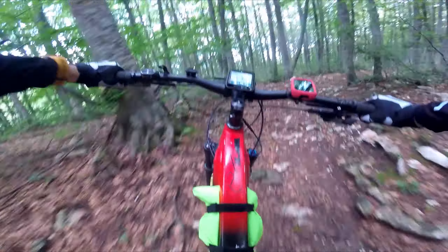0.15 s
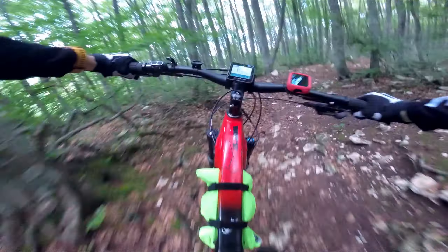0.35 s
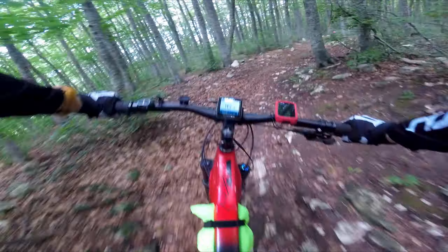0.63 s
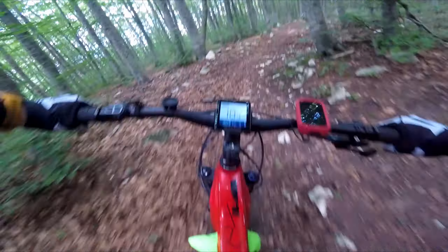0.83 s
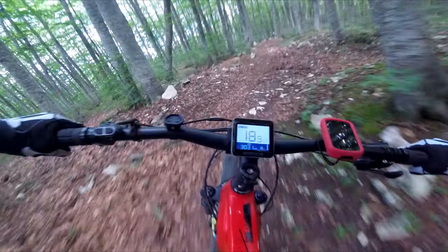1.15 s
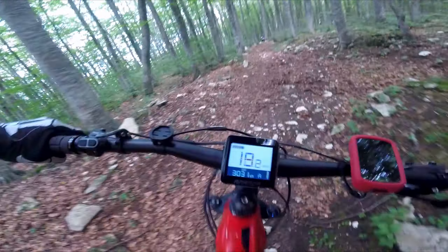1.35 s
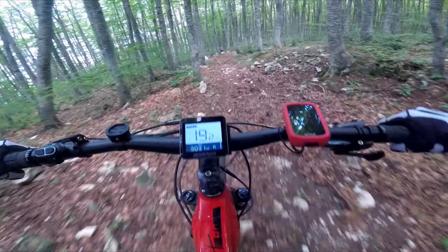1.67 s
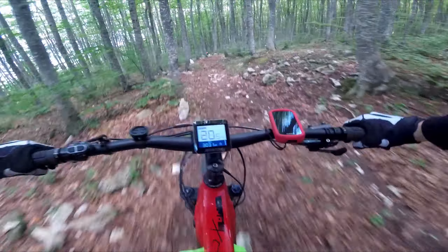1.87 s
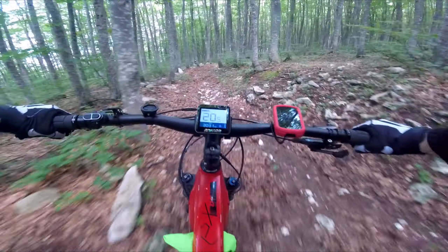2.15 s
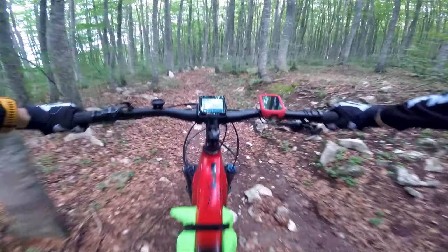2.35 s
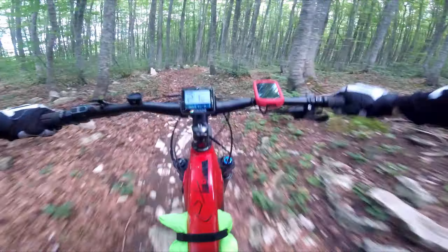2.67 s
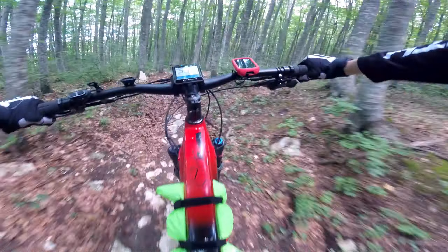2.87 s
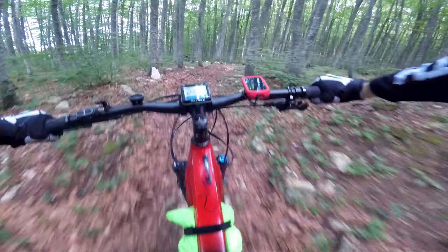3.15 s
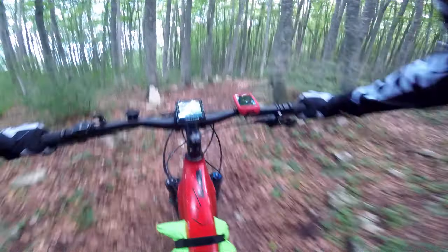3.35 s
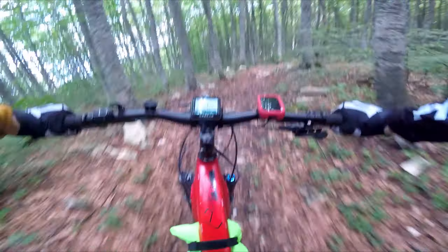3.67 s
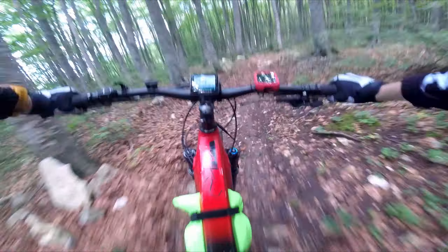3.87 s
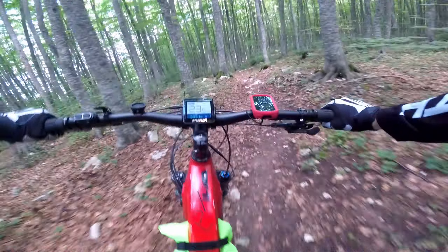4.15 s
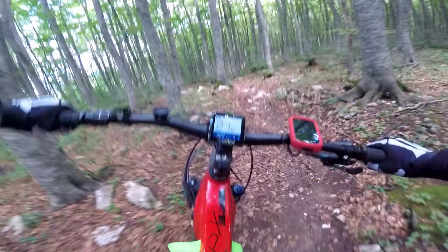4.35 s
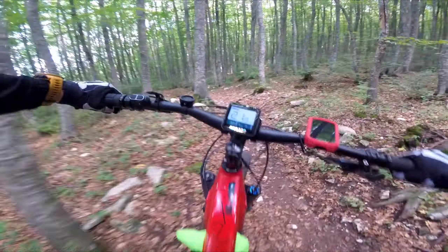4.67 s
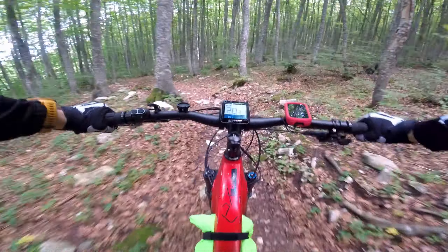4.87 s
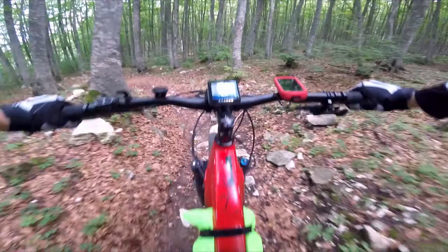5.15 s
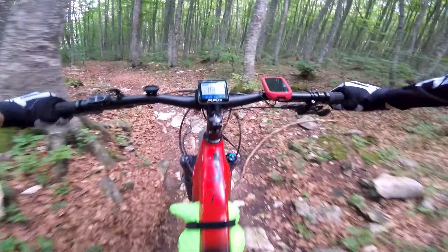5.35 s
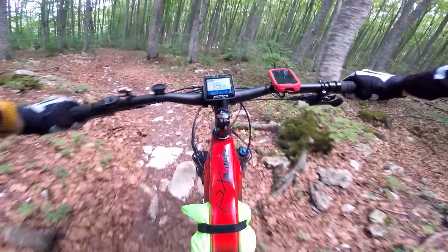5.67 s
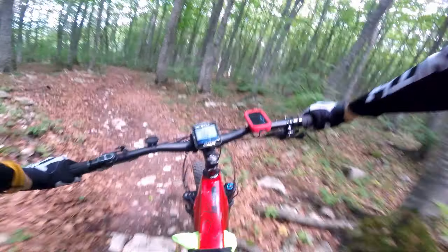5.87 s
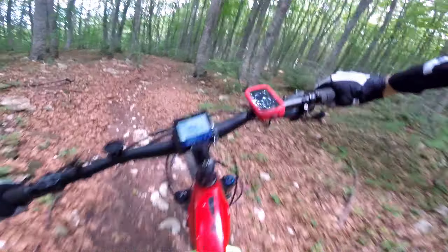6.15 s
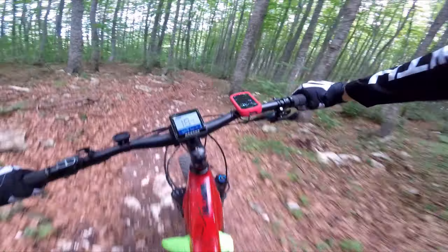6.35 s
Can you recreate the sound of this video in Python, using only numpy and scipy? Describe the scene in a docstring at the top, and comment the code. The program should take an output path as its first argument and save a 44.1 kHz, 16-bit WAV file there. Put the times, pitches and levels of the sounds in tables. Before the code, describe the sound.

Low, fluttering wind and thudding tyres dominate this close, dry ride through woods. Over them, dry leaves and gravel crackle, rising and falling with the ground, while the bike's frame and chain knock sharply against stones at uneven moments. Tiny bright ticks flick by and a faint thin brake hiss comes and goes. Early on, the camera mount takes several heavy muffled bumps and a short rub. The treble is slightly dulled by the housing.

```python
"""On a forest trail, a mountain bike runs fast, heard from a small camera on the rider's chest.
The tyres drum on the soil, crunch gravel and crush leaves: showers of random clicks shaped by filters.
Chain and frame clack over stones and grit ticks: short bursts of noise that set off ringing filters.
A thin hiss, as of brake pads, is filtered noise; the camera mount is bumped (sinking tones) and rubs
(a groan and a scuff). Wind buffets the camera's port: deep noise that swells and fades."""
import sys
import numpy as np
from scipy import signal
from scipy.fft import rfft, irfft, next_fast_len
from scipy.io import wavfile
from scipy.ndimage import uniform_filter1d

SR = 44100
rng = np.random.default_rng(int(sys.argv[2]) if len(sys.argv) > 2 else 0)


def unload_audio(sound):
    """Save the sound as a 16-bit wav file, at the path given as the first command line argument."""
    columns = np.transpose(np.atleast_2d(sound))
    # keep every value between -1 and 1, then stretch to whole-number steps
    steps = np.round(np.clip(columns, -1, 1) * 32767)
    wavfile.write(sys.argv[1], SR, steps.astype(np.int16))


N = 287091
TIME = np.arange(N) / SR  # seconds

# Levels marked "base" get a further trim or random sway in the function that uses them.
# In all spectra only the shape counts: each sound is scaled to a level afterwards.

# The tyres drum on the soil: t/s, base thud level/dB, base frame judder level/dB
DRUM_LEVELS = [(0.0, -38, -34), (0.31, -24, -32.5), (1.68, -29.5, -35.5), (2.01, -24, -35.5),
               (2.48, -24, -26.5), (3.19, -23.5, -27), (3.57, -31.5, -32.5), (4.0, -28, -33),
               (4.66, -22.5, -37.5), (5.35, -26.5, -25.5), (6.07, -30.5, -39.5), (6.51, -29.5, -30)]
# A wheel rides over a root or ridge:
# t/s at full load, thud level/dB, frame judder level/dB, crunch level/dB, release/s
ROOT_HITS = [(0.012, -13.5, -28, -45, 0.017), (0.27, -21, -38, -50, .025), (0.544, -12.5, -24, -38, 0.023),
             (0.774, -16, -20.5, -28, 0.012), (1.337, -26, -22, -33, 0.026), (1.39, -16.5, -46, -67, 0.02),
             (1.505, -16, -35, -60, 0.029), (1.564, -20.5, -27.5, -62, .025),
             (1.674, -14.5, -40, -36.5, 0.041), (2.01, -28, -40, -36, 0.035), (2.114, -26, -30, -40, .03),
             (2.344, -13.5, -22, -39, 0.054), (2.439, -9.5, -26, -38, 0.0073),
             (2.83, -35, -20, -28.5, 0.027), (2.99, -13, -35, -54, 0.057), (3.089, -14, -17, -41, 0.043),
             (3.182, -23, -31, -29, 0.08), (3.751, -18, -18.5, -57, 0.014), (3.932, -18, -21.5, -34, 0.033),
             (4.05, -18, -41, -30.5, 0.04), (4.235, -15.5, -23.5, -35, .025), (4.79, -14.5, -35, -42, .03),
             (4.866, -17, -39, -35, 0.055), (5.037, -17.5, -26.5, -28.5, 0.063),
             (5.433, -14, -18.5, -48, 0.027), (5.71, -19, -23.5, -32.5, 0.0067),
             (5.875, -20, -25.5, -33.5, .03), (5.961, -22, -30, -39, 0.03), (6.14, -24, -48, -41, 0.075)]
LOAD_ATTACK_S = 0.017  # the tyre squashes this fast
# Thuds of the tyres: f/Hz, level/dB per Hz
THUD_SPECTRUM = [(35, -13.5), (58, 5), (80, 1), (115, -2.5), (160, -5.5), (200, -8.5), (280, -26),
                 (500, -36.5), (1000, -66)]
# Judder of the frame: f/Hz, level/dB per Hz
JUDDER_SPECTRUM = [(120, -13.5), (195, 4.5), (280, 4), (340, -2.5), (420, -6.5), (550, -16.5), (1000, -49)]

# The ground under the tyres: t/s, base gravel crunch level/dB, base leaf rustle level/dB
GROUND_LEVELS = [(0.0, -35.5, -38.5), (0.34, -40.5, -51), (0.74, -46, -41), (1.09, -45.5, -49),
                 (1.45, -45, -52.5), (1.9, -45.5, -48), (2.06, -42.5, -50.5), (2.41, -38.5, -45.5),
                 (2.99, -34.5, -38.5), (3.66, -39.5, -47.5), (3.9, -39, -45.5), (4.62, -44, -46),
                 (4.91, -55, -44.5), (5.28, -30.5, -42.5), (5.53, -37, -49), (5.67, -43, -51.5),
                 (6.15, -45.5, -47), (6.51, -36.5, -52.5)]
# Gravel crunch: f/Hz, level/dB per Hz
GRAVEL_SPECTRUM = [(250, -19.5), (450, 8.5), (850, 5.5), (1150, 6.5), (1430, -1.5), (1780, 4.5), (2050, 2),
                   (2420, -3), (3000, -4.5), (4100, -50), (7000, -61.5)]
# Leaf rustle: f/Hz, level/dB per Hz
LEAF_SPECTRUM = [(1500, 6), (3000, 1), (4300, -1), (5300, 6.5), (6200, -2), (7000, -1), (9000, -4.5),
                 (10700, -9.5), (11900, -10), (13300, -3), (15000, -16)]
GRAVEL_PER_S, LEAVES_PER_S = 1500, 1900  # grains under the tyres

# The tyres slide through deep leaves: t/s, swish level/dB
SWISH_LEVELS = [(2.5, -73), (2.62, -40), (2.78, -33), (2.87, -35), (2.94, -34), (3.0, -57)]
# Sliding leaves: f/Hz, level/dB per Hz
SLIDING_SPECTRUM = [(2000, 15), (4000, -27), (5200, 2), (6300, 10.5), (7600, -2), (10600, 2), (12000, -7),
                    (13400, -3), (15000, -6)]

# Chain and frame clack over stones: t/s, base clack level/dB, clack centre f/Hz,
# base hollow knock level/dB, base bright edge level/dB, rattle time to fall by 60 dB/s
STONE_CLACKS = [(0.5474, -27.5, 2520, -26.5, -28.5, 0.12), (0.759, -13.5, 2400, -20.5, -26, 0.038),
                (1.238, -22.5, 3700, -28.5, -27, 0.044), (1.247, -20.5, 1500, -19, -37, 0.07),
                (1.26, -26, 3100, -31, -28.5, 0.099), (1.341, -33, 1410, -30, -39, .05),
                (2.2332, -28, 1690, -27.5, -52, 0.049), (2.385, -21.5, 2120, -17.5, -31.5, 0.09),
                (2.4873, -33, 1410, -24.5, -44, .04), (2.66, -27.5, 2980, -23, -35, 0.055),
                (2.7196, -25, 1970, -17, -41, 0.034), (2.9208, -17, 2190, -17.5, -19, 0.081),
                (3.0708, -22.5, 1890, -18.5, -41, 0.051), (3.1425, -26, 2970, -26, -25, .05),
                (3.3548, -25.5, 1860, -23, -44, 0.032), (3.376, -28, 1850, -26.5, -31, 0.071),
                (3.4815, -26.5, 2370, -24.5, -29, 0.22), (3.582, -19, 2760, -24, -26, 0.1),
                (3.637, -31, 2980, -45, -25.5, 0.035), (3.731, -26, 1670, -25.5, -38, 0.046),
                (4.036, -15, 1920, -18.5, -24.5, 0.076), (4.06, -22, 2270, -28, -48, 0.11),
                (4.2139, -15.5, 2300, -18, -25.5, 0.064), (4.4661, -26.5, 1830, -50, -38, 0.045),
                (4.871, -32.5, 2000, -31, -29.5, 0.045), (5.025, -26, 2080, -26, -38, 0.053),
                (5.221, -13, 2380, -18.5, -21.5, 0.022), (5.2805, -23, 2080, -29, -22, .06),
                (5.351, -26, 2400, -38, -22.5, 0.18), (5.4071, -17.5, 3700, -21, -22.5, 0.033),
                (5.4234, -27, 1410, -14, -52, 0.043), (5.466, -22.5, 1820, -31, -23.5, 0.12),
                (5.699, -18, 1700, -13, -38.5, 0.075), (6.4926, -30, 2750, -41, -24.5, 0.013)]
# Each clack is a light graze, a bright touch, a hollow main blow and a rebound:
# t/s from the row's time, then steps on the clack level/dB, knock level/dB, edge level/dB
CONTACT_STEPS = [(-.004, -12, -9, -10.5), (-.0005, -0.5, -4.5, 0.5), (.006, -5.5, -1.5, -10.5),
                 (0.0129, -18, -12.5, -15)]
# What the frame and chain ring with: f/Hz, width/Hz, base level/dB
FRAME_MODES = [(394, 70, 6), (626, 280, -0.5), (850, 740, 5), (925, 120, 16.5), (1022, 160, -3),
               (1770, 220, 16), (2400, 250, 13), (2630, 140, 16.5), (3180, 96, 8), (3450, 34, 14.5),
               (4080, 150, 0), (5300, 420, 14), (6340, 420, 7), (7100, 100, -22), (7540, 160, 7),
               (9520, 100, 5.5)]

# The larger bits of grit and twig flicked against the bike: t/s, peak level/dB, ring f/Hz
LARGE_TICKS = [(0.1998, -22.5, 6000), (0.623, -32, 5900), (1.0043, -29, 5400), (1.3192, -31, 5380),
               (1.4744, -29.5, 5300), (1.798, -30.5, 5450), (1.848, -25, 5400), (2.0547, -33.5, 5750),
               (2.1268, -25.5, 5430), (2.2516, -23.5, 5630), (2.8546, -22, 6300), (3.033, -30, 5240),
               (3.0924, -32, 5440), (3.2266, -25, 5300), (3.679, -31, 5530), (3.7416, -32, 5500),
               (4.2453, -28, 6200), (4.349, -31.5, 5040), (4.643, -36, 5400), (4.802, -31.5, 5300),
               (5.053, -24, 5400), (5.137, -37, 5360), (5.314, -26.5, 3900), (6.15, -28.5, 5400)]
# Finer grit flies at random
GRIT_PER_S, GRIT_OVER_LEAVES_DB, GRIT_SPREAD_DB = 13, 12, 1
GRIT_HZ, GRIT_SPREAD_OCTAVES = 5400, 0.14

# A thin high hiss comes and goes, as of brake pads brushing the discs: start t/s, end t/s, level/dB
BRAKE_BRUSHES = [(0.0, 0.456, -57), (0.55, 1.022, -53.5), (2.244, 2.603, -53), (4.33, 4.597, -52),
                 (5.007, 5.5, -53)]
BRUSH_FADE_S = 0.018
# The hiss of the discs: f/Hz, level/dB per Hz
DISC_SPECTRUM = [(9000, -18), (10400, -6), (11100, -2), (12000, -15), (12700, -9), (13400, 0), (14500, -24)]

# Dull bumps on the camera mount:
# t/s, peak level/dB of the swell, starting f/Hz, final f/Hz, swell/s, peak click level/dB
MOUNT_BUMPS = [(0.395, -3, 307, 239, 0.0042, -19), (0.5854, 0.5, 295, 131, 0.0028, -42),
               (0.774, 0, 168, 70.4, 0.002, -28), (0.8386, -7, 438, 280, 0.0042, -7.5),
               (2.327, -8, 177, 117.5, 0.0084, -38)]
# The mount rubs and groans: t/s, base pitch f/Hz, groan level/dB, scuff level/dB
MOUNT_RUB = [(0.303, 460, -62, -40), (0.32, 492, -50, -20.5), (0.35, 333, -14.5, -29.5),
             (0.39, 271, -19, -27.5), (0.42, 260, -49, -36)]
# Scuff of the cloth: f/Hz, level/dB per Hz
SCUFF_SPECTRUM = [(300, 1), (680, 6), (1050, -4), (1350, -9), (1620, 1), (2200, -13), (2550, -10),
                  (3100, -19), (4300, -20), (5100, -1.5), (6200, -9), (8300, -16.5), (10700, -23),
                  (12000, -26)]

# Air on the port: t/s, base buffeting level/dB
WIND_LEVELS = [(0.0, -6), (0.05, -14), (0.82, -13.5), (0.85, -23.5), (1.43, -10.5), (1.58, -17.5),
               (2.45, -17.5), (2.65, -11.5), (2.83, -12.5), (3.24, -10.5), (4.42, -13.5), (4.48, -19.5),
               (4.68, -13), (5.02, -13.5), (5.06, -11), (5.58, -10), (5.69, -14), (6.51, -12.5)]
# Buffeting of the wind: f/Hz, level/dB per Hz
WIND_SPECTRUM = [(12, -5.5), (20, 1.5), (28, 7.5), (40, -6.5), (55, -6), (70, -19.5), (100, -15),
                 (200, -51), (600, -77.5)]

CUTOFF_HZ = 15000  # nearly nothing is left above this


def from_db(db):
    """Turn decibels into a gain."""
    return 10 ** (np.asarray(db) / 20)


def rms_one(x):
    """Scale a sound to an average power of one."""
    return x / np.sqrt(np.mean(x ** 2) + 1e-20)


def in_time(rows):
    """Draw straight lines between the rows, giving each column a value at every sample."""
    s, *columns = np.transpose(rows)
    return [np.interp(TIME, s, column) for column in columns]


def butter(x, hz, kind, order=2):
    """Keep the lows, the highs or a band, using no future samples."""
    safe_hz = np.clip(hz, 10, .45 * SR)
    sos = signal.butter(order, safe_hz, kind, fs=SR, output="sos")
    return signal.sosfilt(sos, x + 1e-18)


def colour(x, spectrum):
    """Filter a sound along a spectrum without any pre-echo (minimum phase)."""
    size = 2 * next_fast_len(len(x) // 2 + SR // 4)
    hz, db = np.transpose(spectrum)
    grid = np.maximum(np.arange(size // 2 + 1) * SR / size, 1)
    wanted_db = np.interp(np.log(grid), np.log(hz), db)
    # folding the cepstrum forward in time makes the filter causal
    cepstrum = irfft(np.log(from_db(wanted_db)))
    cepstrum[1:size // 2] *= 2
    cepstrum[size // 2 + 1:] = 0
    response = np.exp(rfft(cepstrum))
    return irfft(rfft(x, size) * response)[:len(x)]


def drift(rate):
    """Wander at random around zero with spread 1; rate is the filter's corner in Hz."""
    # made at every 40th sample, then joined by straight lines
    r = np.exp(-80 * np.pi * rate / SR)
    noise = rng.standard_normal(N // 40 + 2002)
    slow = signal.lfilter([1], [1, -2 * r, r * r], noise)[2000:]
    return np.interp(np.arange(N) / 40, np.arange(len(slow)), rms_one(slow))


def steady(x, span_s):
    """Even out the power to one over every stretch of this length; faster detail stays."""
    power = uniform_filter1d(x ** 2, max(int(span_s * SR), 2))
    return x / np.sqrt(np.maximum(power, 1e-12))


def add(out, s, sound):
    """Mix a sound in at a time in seconds."""
    at = max(int(s * SR), 0)
    out[at:at + len(sound)] += sound[:max(N - at, 0)]


def at_peak(x, db):
    """Scale each blow so that its loudest two milliseconds have this level."""
    power = uniform_filter1d(x ** 2, SR // 500)
    return x * from_db(db) / np.sqrt(power.max(axis=-1, keepdims=True) + 1e-20)


def grains(per_s, spread_db):
    """Scatter clicks of random size and sign; spread_db sets how far the sizes vary."""
    sizes = from_db(spread_db * np.minimum(rng.exponential(1, N), 5))
    signs = rng.choice([-1, 1], N)
    happens = rng.random(N) < per_s / SR
    return rms_one(sizes * signs * happens)


def root_loads():
    """Each root squashes the tyre quickly and lets it go slowly; gains of thud, judder and crunch."""
    out = np.zeros((3, N))
    t = TIME[:SR // 2] - TIME[SR // 20]  # starts 0.05 s before full load
    for s, thud_db, judder_db, crunch_db, release_s in ROOT_HITS:
        age = t[s + t >= 0]
        load = np.exp(-np.where(age < 0, (age / LOAD_ATTACK_S) ** 2, age / release_s))
        for gain, db in zip(out, (thud_db, judder_db, crunch_db)):
            add(gain, s + age[0], from_db(db) * load)
    return out


def drumming(root_thud, root_judder, jolt_db=2.5, thud_gain_db=1.5, judder_gain_db=-1.0):
    """Knobs, pebbles and roots thud through the tyres and make the frame judder."""
    thud_db, judder_db = in_time(DRUM_LEVELS)
    thuds = steady(colour(grains(per_s=370, spread_db=2.0), THUD_SPECTRUM), span_s=0.0594)
    judder = steady(colour(grains(per_s=270, spread_db=3.5), JUDDER_SPECTRUM), span_s=0.09)
    shake_db = jolt_db * drift(rate=55)
    # hypot adds the powers of the soil and the roots
    thud_gain = np.hypot(from_db(thud_db + thud_gain_db + shake_db), root_thud)
    judder_gain = np.hypot(from_db(judder_db + judder_gain_db + shake_db), root_judder)
    return thud_gain * thuds + judder_gain * judder


def tyres(root_crunch, gravel_gain_db=0.5, leaf_gain_db=2.0, root_leaf_db=-5, gravel_jolt_db=2.2,
          leaf_jolt_db=3.0, clump_db=-2.0, chatter_db=-8, snap_db=-2.5):
    """The tyres grind gravel in clumps and crush leaves; roots and small jolts press both harder."""
    gravel_db, leaf_db = in_time(GROUND_LEVELS)
    jolt = drift(rate=22)
    gravel_grains = grains(GRAVEL_PER_S, spread_db=3.0) + .5 * rng.standard_normal(N)
    gravel = rms_one(colour(gravel_grains, GRAVEL_SPECTRUM))
    leaf_grains = grains(LEAVES_PER_S, spread_db=3.0) + 0.98 * rng.standard_normal(N)
    leaves = steady(colour(leaf_grains, LEAF_SPECTRUM), span_s=.12)
    # the chain and cables chatter, carried by the same shaking as the gravel
    chatter = rms_one(frame(grains(per_s=280, spread_db=5.5), np.zeros(len(FRAME_MODES))))
    crackle = from_db(snap_db) * snaps()
    clumps = from_db(clump_db * drift(rate=23))
    crunch = steady(clumps * gravel + from_db(chatter_db) * chatter + crackle, span_s=.12)
    crunch_gain = np.hypot(from_db(gravel_db + gravel_gain_db + gravel_jolt_db * jolt), root_crunch)
    leaf_gain = np.hypot(from_db(leaf_db + leaf_gain_db + leaf_jolt_db * jolt),
                         from_db(root_leaf_db) * root_crunch)
    return crunch_gain * crunch + leaf_gain * leaves


def snaps(per_s=170, spread_db=1.4, width=0.16, low_hz=700, high_hz=3300):
    """Twigs and pebbles give way one by one, each with a short ring at one of 14 pitches."""
    sizes = from_db(spread_db * np.minimum(rng.exponential(1, N), 3))
    clicks = sizes * (rng.random(N) < per_s / SR)
    pitches = np.geomspace(low_hz, high_hz, 14)
    dealt = rng.integers(0, len(pitches), N)
    rings = 0
    for k, hz in enumerate(pitches):
        band = [hz / (1 + width), hz * (1 + width)]
        rings = rings + butter(clicks * (dealt == k), band, "band") / hz
    return rms_one(rings)


def swish():
    """Sliding leaves crackle so densely that they merge into a bright hiss."""
    level_db, = in_time(SWISH_LEVELS)
    return from_db(level_db) * rms_one(colour(grains(per_s=15000, spread_db=4.5), SLIDING_SPECTRUM))


def clacks(clack_gain_db=-0.1, knock_gain_db=-.5, edge_gain_db=-0.4):
    """Every stone sets off the same quick run of contacts between chain and frame."""
    out = np.zeros(N)
    after_s, clack_step_db, knock_step_db, edge_step_db = np.transpose(CONTACT_STEPS)[:, :, None]
    for s, clack_db, clack_hz, knock_db, edge_db, rattle_t60 in STONE_CLACKS:
        rings = np.array([clack(rattle_t60) for _ in CONTACT_STEPS])
        # split the ringing into a middle clack, a hollow knock and a bright edge
        centred = butter(rings, [clack_hz / 1.35, clack_hz * 1.35], "band", order=1)
        middle = butter(centred, [1300, 4700], "band")
        knock = butter(rings, [320, 1250], "band", order=3)
        edge = butter(rings, [4900, 10000], "band", order=3)
        blows = (at_peak(middle, clack_db + clack_step_db + clack_gain_db)
                 + at_peak(knock, knock_db + knock_step_db + knock_gain_db)
                 + at_peak(edge, edge_db + edge_step_db + edge_gain_db))
        for delay_s, blow in zip(after_s[:, 0], blows):
            add(out, s + delay_s, blow)
    return out


def clack(rattle_t60, crack_s=0.0023, rattle_db=-12, rattle_per_s=900, contact_db=0.5):
    """A gritty contact cracks and sets the frame ringing, then the chain rattles out in smaller touches."""
    t = TIME[:SR // 10]
    crack = rng.standard_normal(len(t)) * (t / crack_s) ** 2 * np.exp(4 - 4 * t / crack_s) / 2
    touches = rms_one(rng.standard_normal(len(t)) * (rng.random(len(t)) < rattle_per_s / SR))
    force = crack + touches * from_db(rattle_db - 60 * t / rattle_t60)
    # the contact itself is heard beside the ringing it starts
    return rms_one(frame(force, strike_point())) + from_db(contact_db) * rms_one(force)


def frame(force, shares_db):
    """The bike's resonances ring side by side, each with its share of the blow."""
    out = 0
    for k, (hz, width_hz, db) in enumerate(FRAME_MODES):
        r = np.exp(-np.pi * width_hz / SR)  # the wider the resonance, the sooner it dies
        top = np.array([1, 0, -1]) * (1 - r * r) / 2
        bottom = [1, -2 * r * np.cos(2 * np.pi * hz / SR), r * r]
        mode = signal.lfilter(top, bottom, force + 1e-18)
        out = out + (-1) ** k * from_db(db + shares_db[k]) * mode
    return out


def strike_point():
    """Each place on the bike favours other resonances: random shares in dB."""
    return 2.5 * rng.standard_normal(len(FRAME_MODES))


def ticks(ring_s=0.0021, body_db=-7, tail_db=-24, tail_t60=0.031):
    """Small hard things ping for a few milliseconds and faintly stir the frame."""
    out, t = np.zeros(N), TIME[:SR // 30]
    for s, db, hz in LARGE_TICKS + fine_grit():
        fading = np.exp(-t / ring_s) + from_db(tail_db - 60 * t / tail_t60)
        force = rng.standard_normal(len(t)) * fading
        ping = rms_one(butter(force, [hz * 0.96, hz * 1.05], "band", order=1))
        body = rms_one(butter(frame(force, strike_point()), 1500, "high"))
        add(out, s, at_peak(ping + from_db(body_db) * body, db))
    return out


def fine_grit(count=140):
    """Random small ticks, louder where the leaves rustle more: rows of t/s, peak level/dB, ring f/Hz."""
    times = np.cumsum(rng.exponential(1 / GRIT_PER_S, count))
    trail_s, _, leaf_db = np.transpose(GROUND_LEVELS)
    spread_db = GRIT_SPREAD_DB * rng.standard_normal(count)
    db = np.interp(times, trail_s, leaf_db) + GRIT_OVER_LEAVES_DB + spread_db
    hz = GRIT_HZ * 2 ** (GRIT_SPREAD_OCTAVES * rng.standard_normal(count))
    return [row for row in zip(times, db, hz) if row[0] < TIME[-1]]


def brakes():
    """A high hiss, as of pads brushing the discs; each brush fades in, holds and fades out."""
    level = np.zeros(N)
    for start, end, db in BRAKE_BRUSHES:
        to_nearest_end = np.minimum(TIME - start, end - TIME)
        level += from_db(db) * np.clip(to_nearest_end / BRUSH_FADE_S, 0, 1)
    return level * rms_one(colour(rng.standard_normal(N), DISC_SPECTRUM))


def bumps(sag_s=0.0025):
    """A blow on the mount starts with a click, then swells and dies within a few cycles, sinking in pitch."""
    out, t = np.zeros(N), TIME[:SR // 10]
    click = butter(t * np.exp(-t / .0004), [650, 2100], "band", order=4)
    click = click / np.abs(click).max()
    for s, db, start_hz, end_hz, swell_s, click_db in MOUNT_BUMPS:
        hz = end_hz + (start_hz - end_hz) * np.exp(-t / sag_s)
        phase = 2 * np.pi * np.cumsum(hz) / SR
        age = t / swell_s
        swing = age ** 2 * np.exp(2 - 2 * age) * np.sin(phase)  # fullest at swell_s
        add(out, s, from_db(db) * swing + from_db(click_db) * click)
    return out


def rub(waver=.04):
    """Cloth drags on the mount: a stick-slip groan, mostly falling in pitch, under a scuff."""
    hz, groan_db, scuff_db = in_time(MOUNT_RUB)
    phase = 2 * np.pi * np.cumsum(hz * (1 + waver * drift(rate=106))) / SR
    groan = np.sin(phase) + 0.15 * np.sin(2 * phase)
    scuff = rms_one(colour(grains(per_s=4000, spread_db=-1.5), SCUFF_SPECTRUM))
    rubbing = (TIME > MOUNT_RUB[0][0]) * (TIME < MOUNT_RUB[-1][0])
    return (from_db(groan_db) * groan + from_db(scuff_db) * scuff) * rubbing


def wind(gain_db=-1.0, gust_db=1.0):
    """Eddies break on the port as slow lumps of pressure."""
    level_db, = in_time(WIND_LEVELS)
    eddies = butter(colour(rng.standard_normal(N), WIND_SPECTRUM), 9.8, "high")
    gusts_db = gust_db * drift(rate=2.7)
    return from_db(level_db + gain_db + gusts_db) * steady(eddies, span_s=0.0725)


def scene():
    """Mix all the sounds, close and dry, with no echo."""
    root_thud, root_judder, root_crunch = root_loads()
    rolling = wind() + drumming(root_thud, root_judder) + tyres(root_crunch) + swish() + brakes()
    return (rolling + bumps() + rub() + clacks() + ticks())[None]


def record(dry):
    """The highest peaks are rounded, the camera's housing dulls the treble, and the very top is cut."""
    rounded = dry[0] / (1 + (np.abs(dry[0]) / .95) ** 10) ** (1 / 10)  # stays within 0.95
    housed = colour(rounded, [(10600, 0), (11800, -13), (15000, -15)])  # f/Hz, level/dB
    cut = signal.ellip(10, .1, 80, CUTOFF_HZ, fs=SR, output="sos")
    return signal.sosfilt(cut, housed)[None]


dry = scene()
out = record(dry)
unload_audio(out)
```